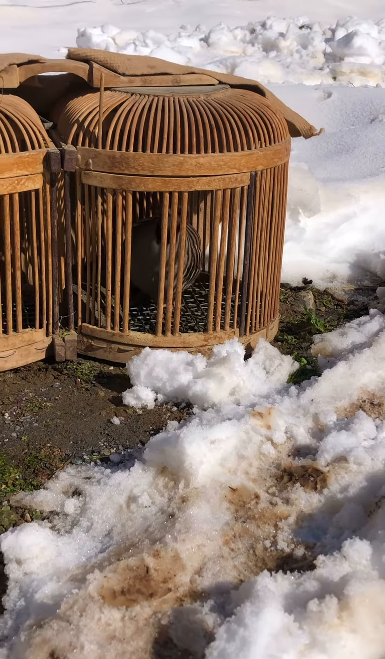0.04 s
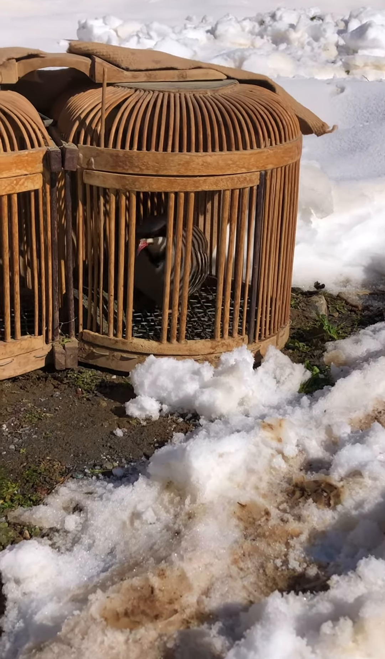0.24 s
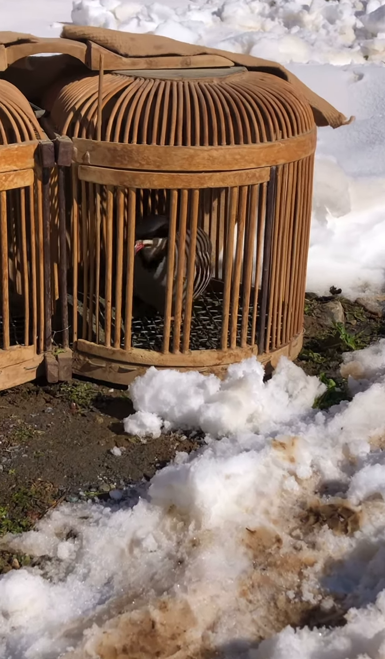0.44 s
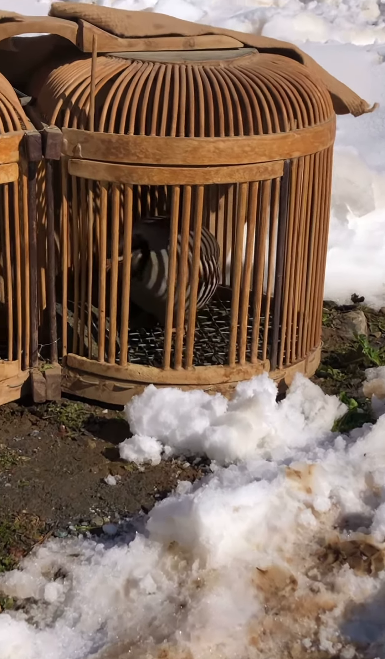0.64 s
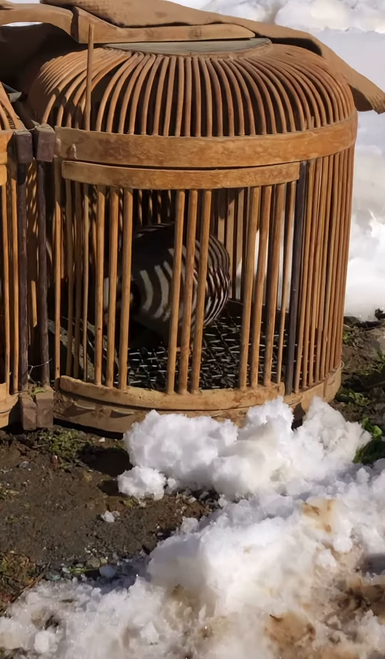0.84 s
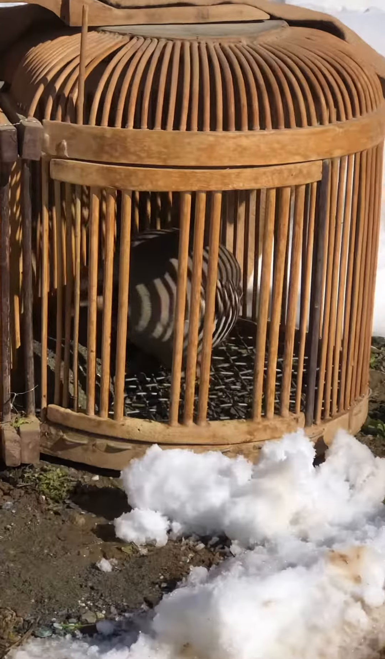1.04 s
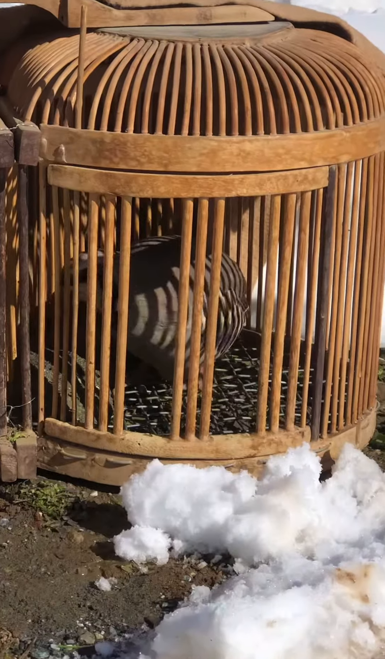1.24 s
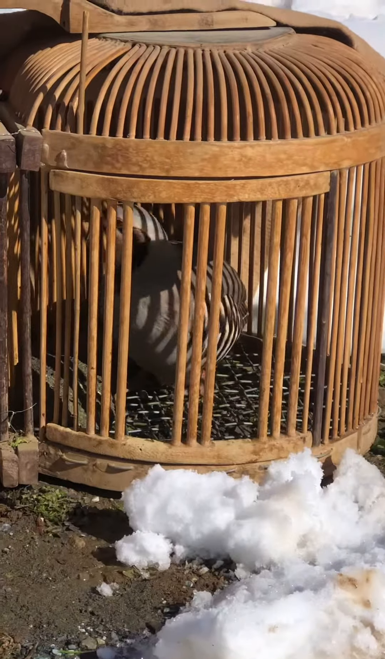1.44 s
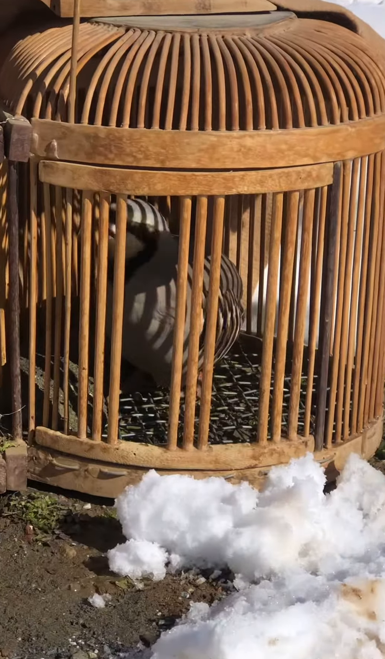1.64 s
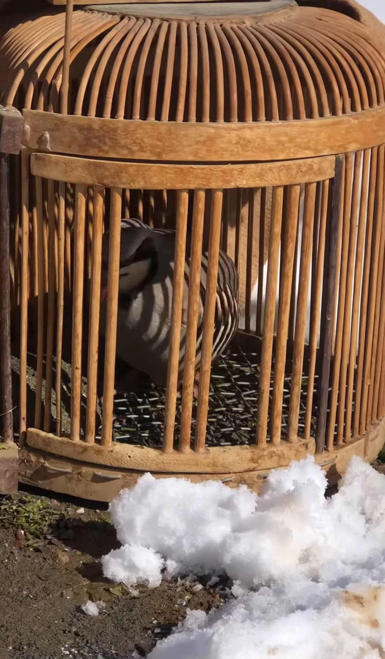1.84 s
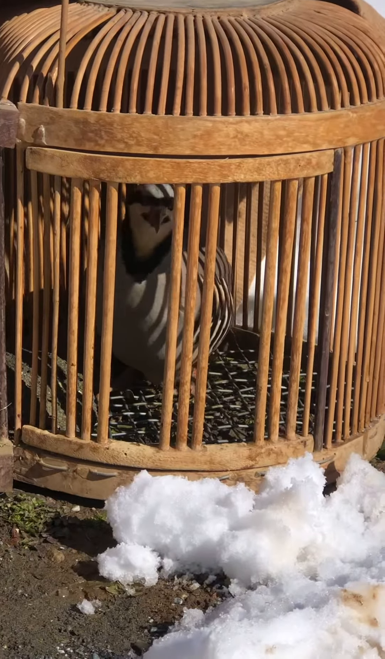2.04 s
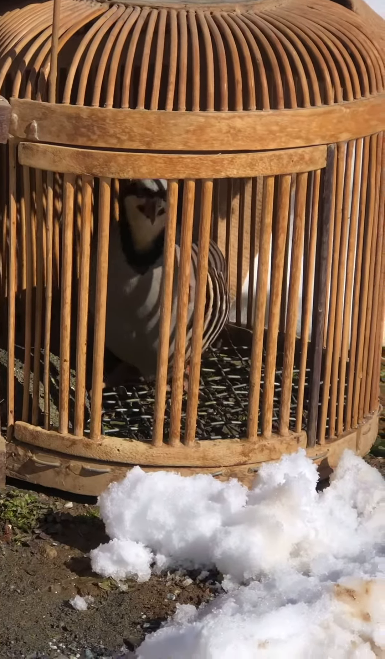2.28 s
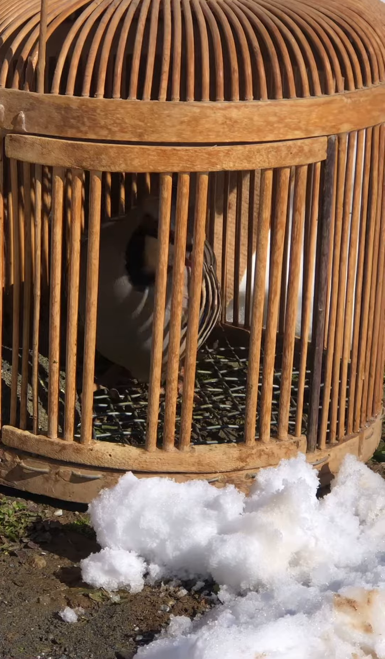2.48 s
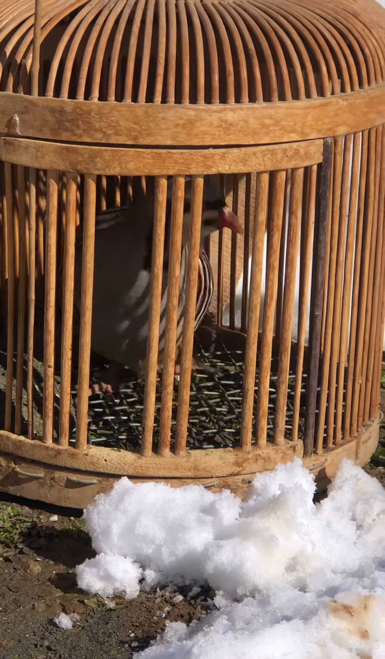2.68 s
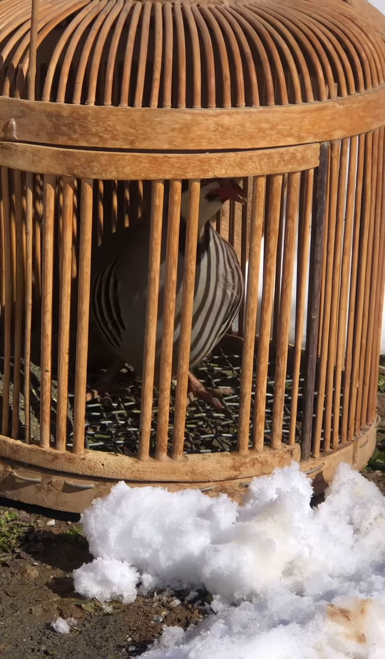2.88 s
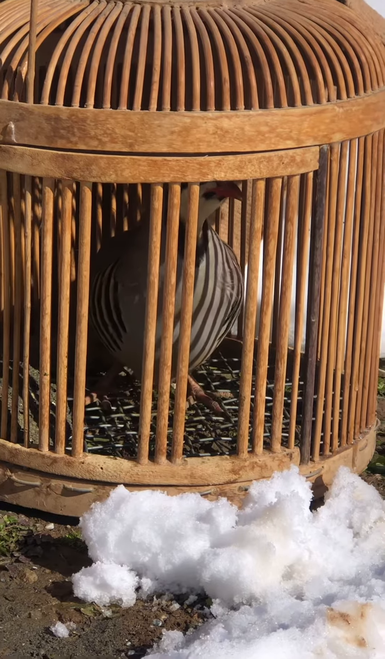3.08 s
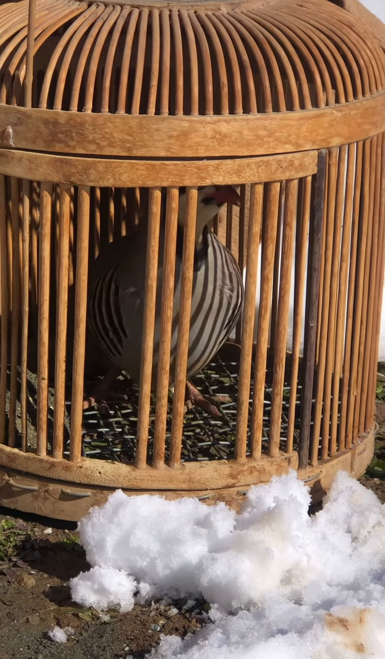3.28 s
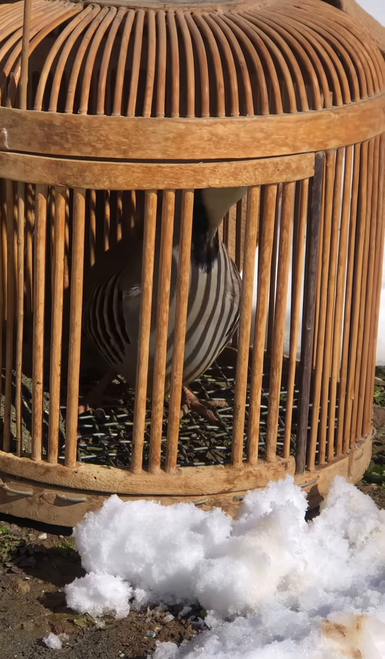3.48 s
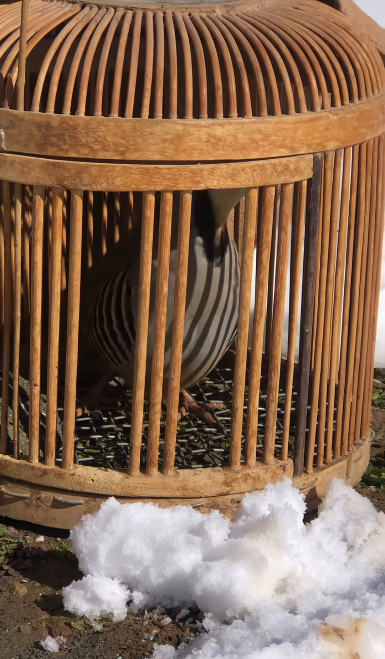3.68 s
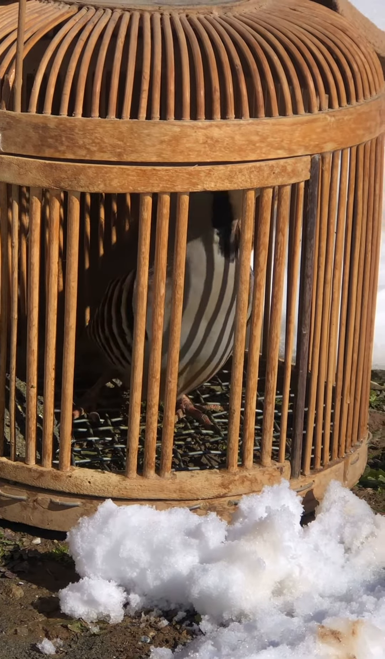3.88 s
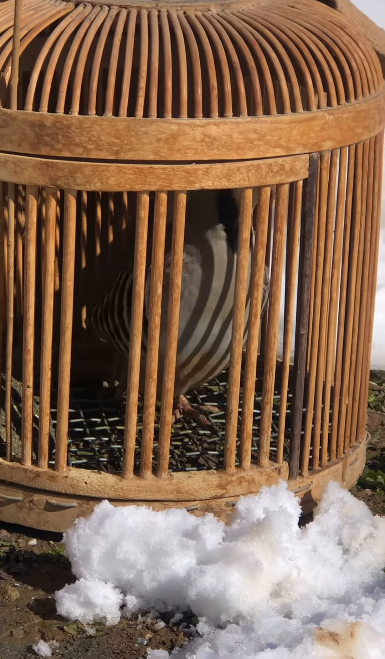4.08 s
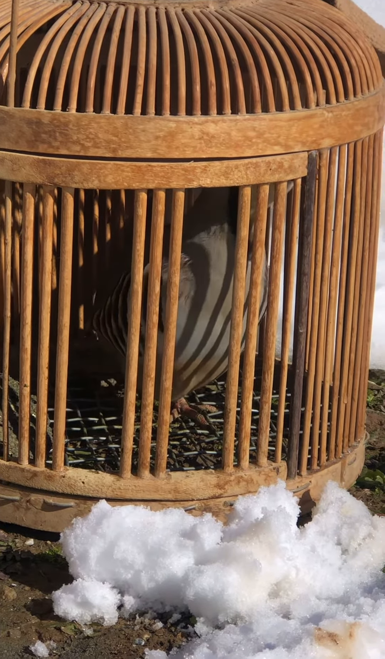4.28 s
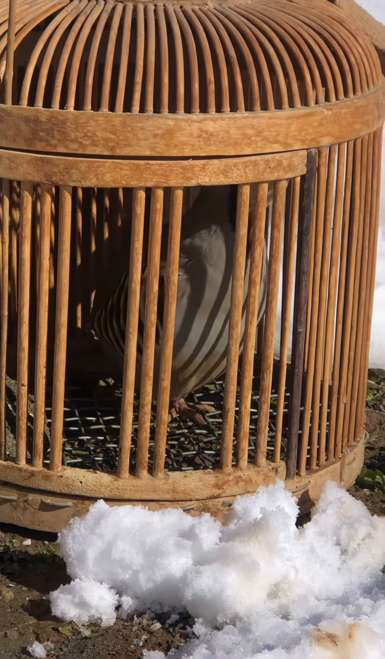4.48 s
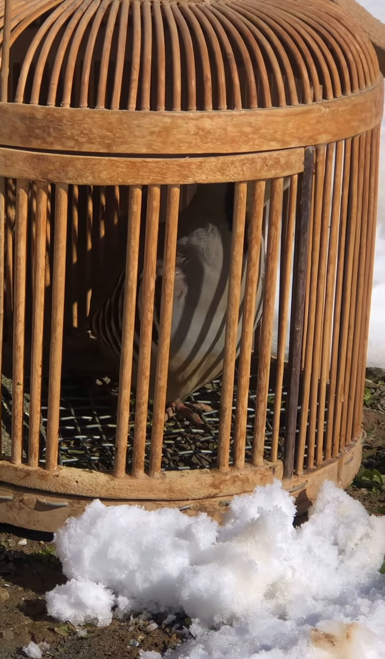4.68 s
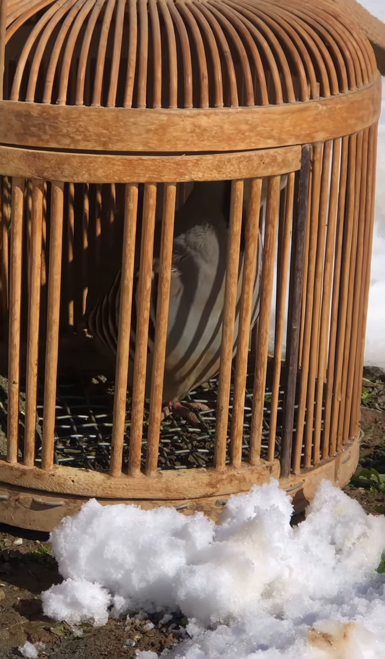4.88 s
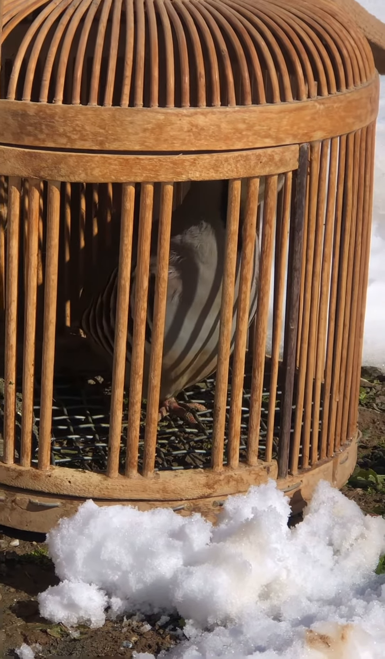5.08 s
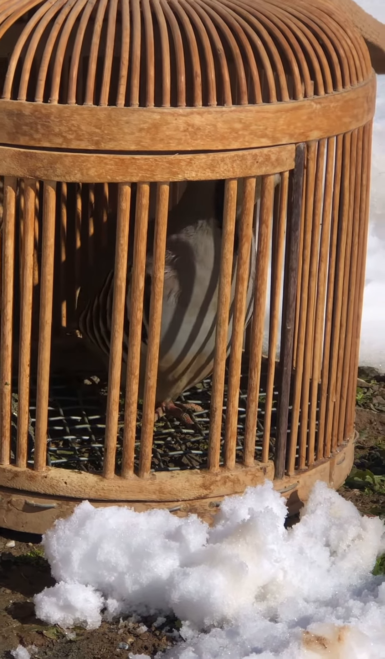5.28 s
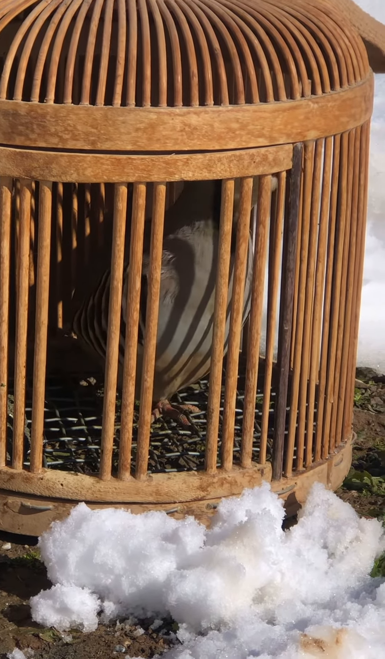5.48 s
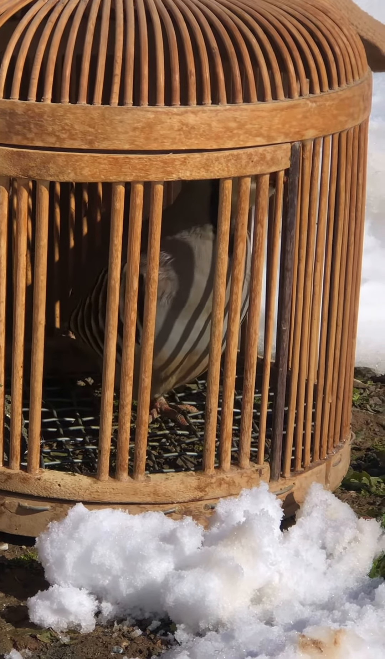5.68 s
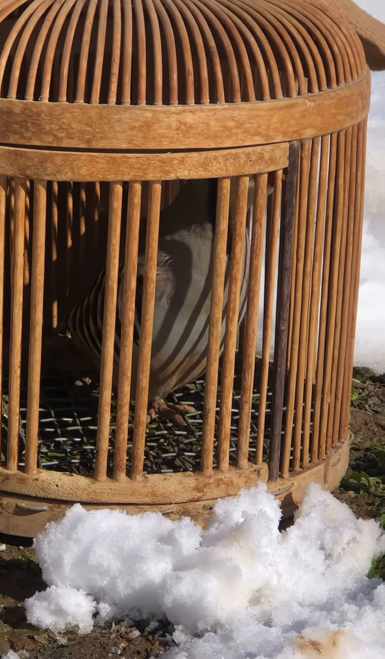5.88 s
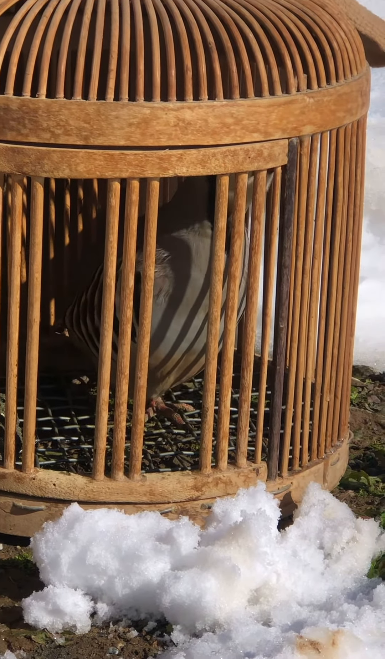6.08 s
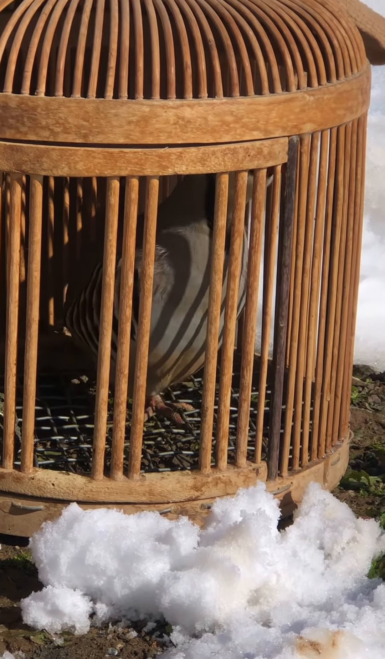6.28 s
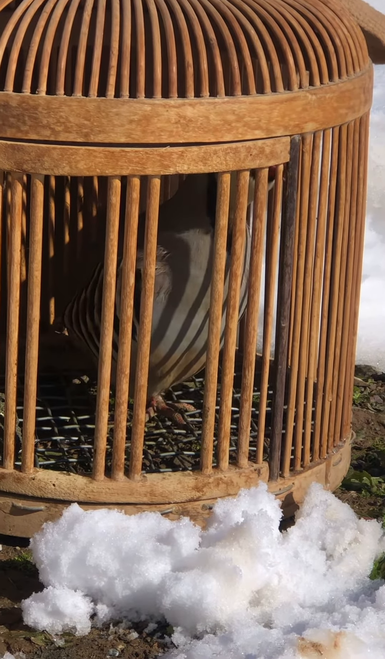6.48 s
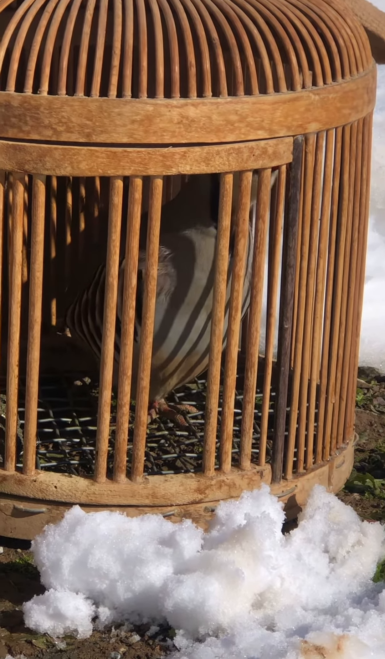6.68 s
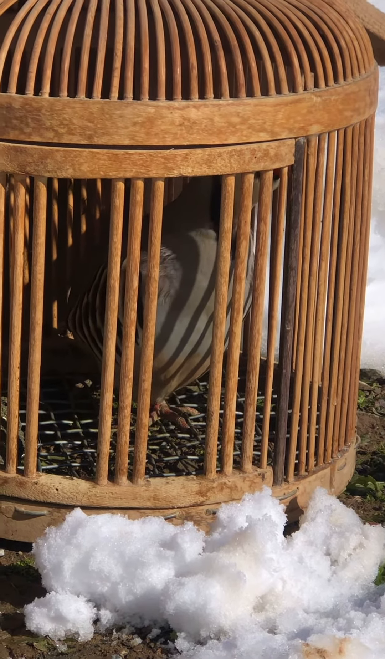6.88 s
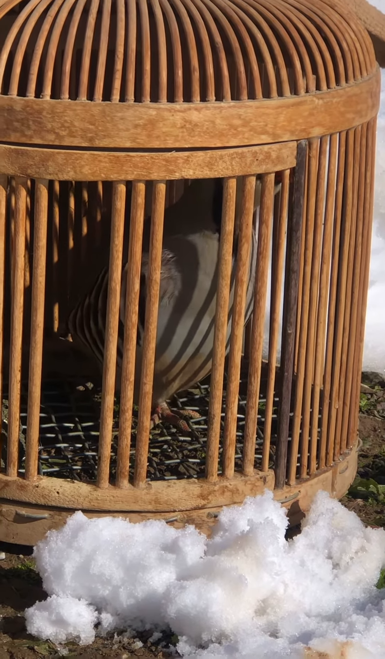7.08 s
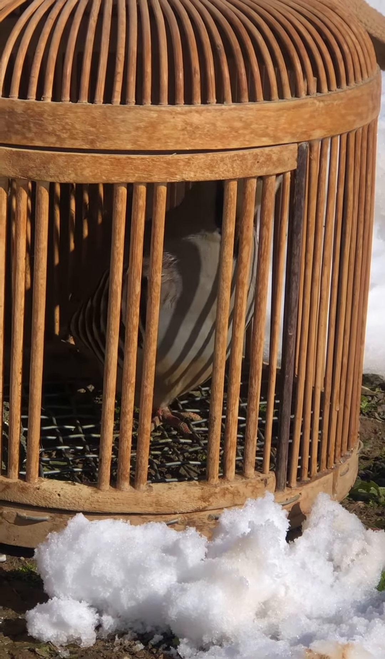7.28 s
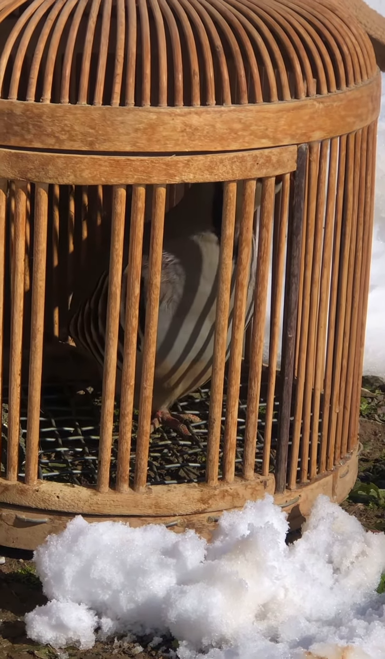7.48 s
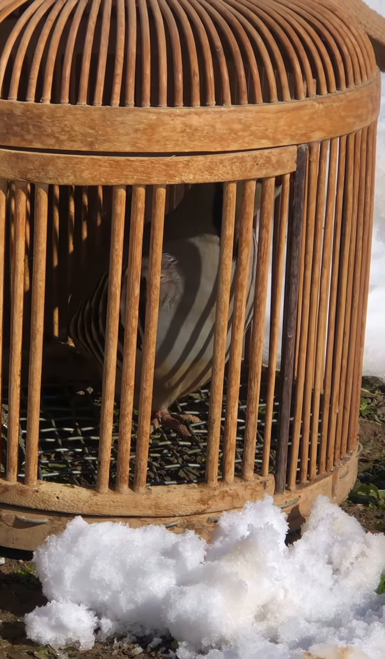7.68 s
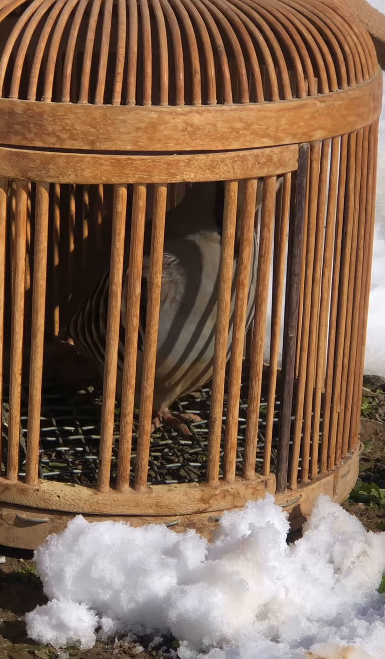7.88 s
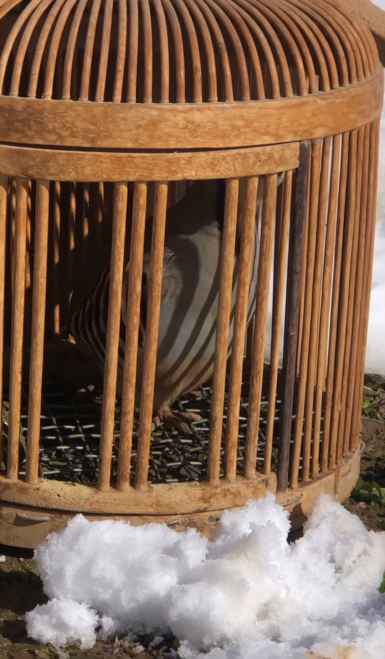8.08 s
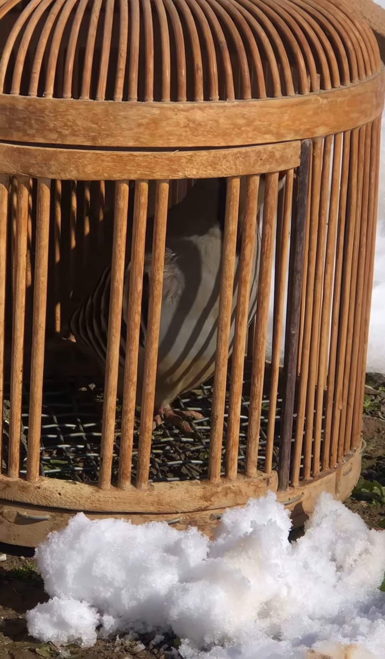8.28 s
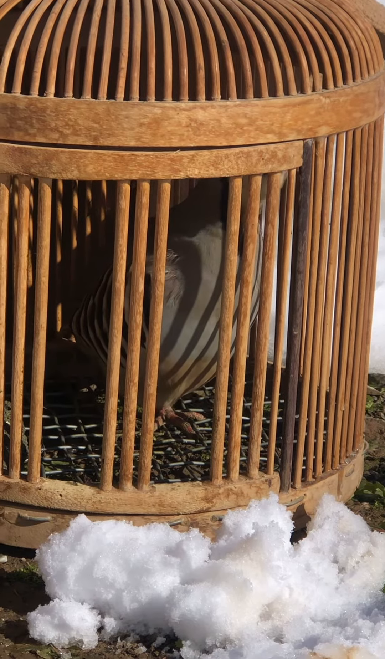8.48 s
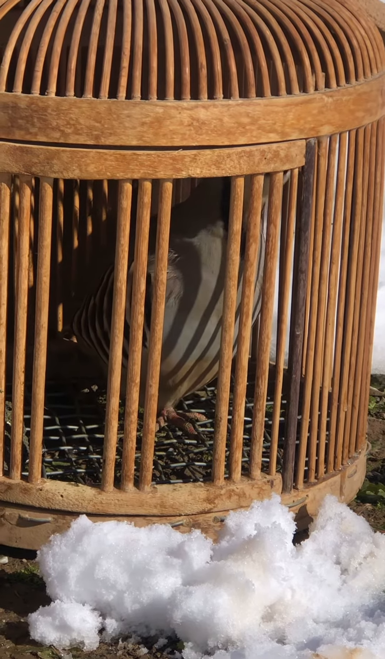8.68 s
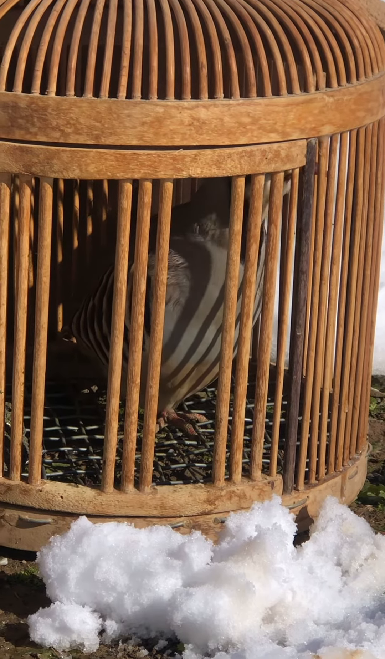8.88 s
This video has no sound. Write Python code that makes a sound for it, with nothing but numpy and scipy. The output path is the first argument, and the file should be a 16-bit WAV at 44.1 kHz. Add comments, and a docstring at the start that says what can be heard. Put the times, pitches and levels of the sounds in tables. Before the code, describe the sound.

Outdoors in quiet, snowy surroundings, a caged partridge is heard from close by. It begins with scattered low clucks, then works up to a loud, raspy run of rapid notes repeated in groups of three. Its wicker cage ticks lightly and its feet tap softly on the floor. Behind it are faint air noise, one tiny falling whistle from a small bird midway, and a distant partridge answering at the end.

```python
"""Rally call of a caged partridge

A chukar in a wicker cage on snowy ground works up from soft clucks to a loud, hoarse rally call.
Its voice is a source and a filter: the syrinx slips between periodic and irregular vibration, and
chest, throat and beak resonate, the beak opening wider from note to note. The cage gives small ticks
and footfalls; in a light breeze a distant partridge answers and a small bird whistles once."""
import sys
import numpy as np
from scipy import signal
from scipy.io import wavfile
from scipy.ndimage import uniform_filter1d, minimum_filter1d

SR = 44100
rng = np.random.default_rng(int(sys.argv[2]) if len(sys.argv) > 2 else 0)


def output_pcm(signal):
    """Save a mono or channel-first signal as 16-bit PCM at the path in sys.argv[1].

    Samples are clipped to [-1, 1] before scaling.
    """
    pcm = np.clip(np.atleast_2d(signal).T, -1, 1) * 32767
    wavfile.write(sys.argv[1], SR, np.round(pcm).astype(np.int16))


N = 394243

# Spectra of the outdoor air and of the breeze on the microphone: frequency_hz, gain_db
AIR_SPECTRUM = [(15, -31), (25, -4.5), (76, 1.5), (185, -3), (263, -3.5), (911, -8), (1070, -5.5),
                (1610, -8), (2000, -10.5), (2990, -11), (5280, -16), (14800, -25), (16000, -28)]
BREEZE_SPECTRUM = [(15, -11), (45, -5), (90, -3), (160, -11), (400, -37), (1500, -58)]
# Strength of the breeze: time_s, level_db
GUSTS = [(0, -87), (.28, -88), (.42, -64), (.52, -69), (.7, -72), (.82, -67), (1.05, -70), (1.3, -92),
         (8.94, -88)]
# Reverberation time of the yard: frequency_hz, t60_s
YARD_DECAY = [(200, 0.94), (1400, 1), (3500, 1), (8000, 0.57), (16000, 0.048)]
# Falling whistle of the small bird: time_s, pitch_hz, level_db
WHISTLE_GLIDE = [(5.172, 9000, -75), (5.185, 8800, -71), (5.205, 8050, -71), (5.218, 7000, -66),
                 (5.228, 6400, -61)]
# Notes of the distant partridge: start_s, length_s, relative_db, throat_hz
ANSWER_NOTES = [(8.271, 0.036, -47, 1570), (8.457, 0.027, -41, 1640), (8.628, 0.043, -44, 1700),
                (8.661, 0.049, -45.5, 1570), (8.836, 0.04, -42, 1700)]

# Ticks at the cage: start_s, woody_relative_db, sharp_relative_db
CAGE_TICKS = [(0.2177, -35, -41), (0.258, -59, -62), (0.71, -58, -59), (0.7532, -47, -53),
              (0.814, -30.5, -48), (0.861, -52, -65), (0.9133, -50.5, -57.5), (1.426, -38, -49.5),
              (1.521, -48, -58), (1.7642, -45.5, -54.5), (2.047, -37, -47), (2.2387, -55, -58),
              (2.6383, -35.5, -45), (2.843, -48, -55), (3.2955, -44, -53.5), (3.3353, -39.5, -59),
              (3.821, -39, -49.5), (3.931, -48, -46), (4.4373, -34.5, -50.5), (4.9912, -43, -51.5),
              (5.0465, -48, -46), (5.1435, -49, -58), (5.7598, -53, -57.5), (5.9358, -42, -46.5),
              (6.3684, -49, -47.5), (6.8588, -36.5, -51), (7.1566, -41.5, -50), (7.451, -38.5, -46),
              (7.5613, -44, -67), (8.07, -39, -46.5), (8.6668, -33.5, -44.5), (8.761, -42, -58)]
# Footfalls on the cage floor: start_s, relative_db
FOOTFALLS = [(0.501, -40.5), (0.542, -44), (0.731, -51), (0.779, -55), (2.855, -45.5), (3.829, -58),
             (4.334, -45.5), (5.173, -46.5), (5.759, -46.5), (6.956, -48), (8.046, -47)]
# Spectra of the two parts of a tick and of a footfall: frequency_hz, gain_db
WOODY_SPECTRUM = [(400, -20), (1500, -23), (3000, -10), (5500, -8.5), (8000, -22), (15000, -29.5)]
SHARP_SPECTRUM = [(2000, -71), (6000, -8.5), (9000, 10), (12500, 9.5), (16000, 3)]
FOOT_SPECTRUM = [(80, -28), (250, 6), (600, -4), (1400, -2.5), (2500, -22.5), (6000, -41), (15000, -47)]

# Responses of the shut beak, the chest and the throat: frequency_hz, gain_db
SHUT_BEAK_RESPONSE = [(150, -20), (280, -3), (450, -1.5), (700, -4.5), (950, -2), (1100, -8.5),
                      (1300, -14.5), (1600, -17), (2200, -28), (3000, -28.5), (4200, -38), (5600, -31.5),
                      (8000, -41), (15000, -49)]
CHEST_RESPONSE = [(100, -16), (200, -5), (450, 0), (650, -5.5), (900, -10), (1150, -7), (1700, -62),
                  (3000, -78)]
THROAT_RESPONSE = [(400, -35), (800, -28), (1020, -11), (1170, 4), (1350, 4), (1550, -1), (1750, -13.5),
                   (2000, -25.5), (2600, -37.5), (4000, -37.5), (8000, -77.5)]
# Resonances of the open beak: ratio_to_strongest, final_half_width_hz, gain_db
BEAK_FORMANTS = [(.8, 330, -10.5), (1, 230, 3), (1.402, 220, -13.5), (1.63, 260, -12), (2.06, 260, -18.5),
                 (2.4, 383, -25), (2.95, 544, -25.5), (3.45, 501, -22.5), (4.3, 850, -24.5)]
# The resonances sink as the beak opens: time_s, strongest_hz, treble_gain_db, top_extra_gain_db
BEAK_OPENING = [(2.15, 5200, 4, 10), (2.55, 5600, 0, 1), (2.8, 4570, -5, 8), (3.3, 4610, -4.5, 12),
                (3.55, 4185, -3, 1.5), (4.1, 4350, -5, 4.5), (4.552, 3815, -2, 2),
                (5.101, 3608, -1.5, -2.5), (5.65, 3492, -0.5, -3.5), (6.501, 3457, -1.5, -2.5),
                (8.599, 3460, 0, -3)]

# Clucks with the beak shut: start_s, length_s, first_hz, top_hz, last_hz, roughness (0-1), level_db
CLUCK_NOTES = [(0.28, 0.03, 603, 1030, 920, 0.31, -39), (1.126, 0.035, 544, 892, 937, 0.67, -42),
               (1.43, 0.035, 499, 920, 950, 0.67, -41), (1.766, 0.037, 588, 998, 1038, 0.9, -38.5),
               (1.862, 0.021, 940, 840, 710, 0.35, -39.5), (1.892, 0.044, 863, 900, 166, 0.7, -38.5)]
# The call repeats a growing phrase of three notes: a yelp (later a bark), a chuck and a drawl.
# Base values of the short notes: start_s, length_s, pitch_hz, throat_db, chest_db, treble_db
YELP_NOTES = [(2.134, 0.069, 749, -34, -48, -58), (2.347, 0.069, 668.4, -35, -48, -58),
              (2.529, 0.085, 725, -36, -46, -56.5), (2.733, 0.057, 697, -30.5, -48, -48.5),
              (3.19, 0.069, 721.6, -28, -47.5, -44), (3.689, 0.071, 692.3, -24.5, -46, -38.5),
              (4.204, 0.066, 743.5, -24, -45.5, -37)]
CHUCK_NOTES = [(2.89, 0.061, 700, -32, -46.5, -45.5), (3.347, 0.06, 711, -34.5, -44.5, -43),
               (3.86, 0.06, 710, -29.5, -46, -39.5), (4.37, 0.06, 758, -31.5, -41.5, -38.5),
               (4.912, 0.063, 730, -31, -40, -35.5), (5.475, 0.061, 724, -29, -41.5, -33),
               (6.043, 0.062, 727.5, -32, -39.5, -32.5), (6.613, 0.062, 713, -31, -39.5, -32),
               (7.186, 0.057, 728, -33.5, -39, -33), (7.776, 0.059, 732, -32, -40, -33),
               (8.388, 0.066, 709.6, -31, -40, -31.5)]
# A yelp arches, cracks and falls; a chuck is hoarse until its pitch has dropped:
# length_share, pitch_ratio, roughness (0-1), throat_offset_db, chest_offset_db, treble_offset_db
YELP_GESTURE = [(0, 0.86, 0.1, -13.5, -5.5, -23), (0.13, 0.97, 0.43, -1.5, -2, -3),
                (0.36, 1.03, 0.56, 4.5, 0, 4), (0.53, 0.8, 0.98, -0.5, 2.5, -0.5),
                (0.7, 0.54, 0.5, -0.5, 2, 1), (0.87, 0.385, 0.46, -7.5, 4, -9),
                (1, 0.335, 0.55, -18, 0, -24)]
CHUCK_GESTURE = [(0, 1.04, 0.32, -15.5, -10, -29), (0.13, 1.06, 0.61, -0.5, -6.5, -7),
                 (0.32, 0.95, 0.9, 1, -4.5, 0), (0.55, 0.83, 0.7, 1, 0.5, -1),
                 (0.74, 0.65, 0.6, -5, 0.5, -1), (0.88, 0.52, 0.37, -5, 4, -12.5),
                 (1, 0.48, 0.7, -30, -7.5, -19)]
# Base values of the long notes: start_s, length_s, break_share, catch_share, opening_hz, held_hz,
# opening_db, held_db, swell_db, chest_db, treble_db
BARK_NOTES = [(4.728, 0.084, 0.44, 0.57, 754, 385, -21, -22, -27, -41.5, -38),
              (5.272, 0.094, 0.35, 0.65, 742.4, 435.7, -23, -21, -23.5, -39.5, -33.5),
              (5.841, 0.09, 0.3, 0.66, 759.7, 440, -25.5, -21.5, -22.5, -39, -33.5),
              (6.409, 0.089, 0.36, 0.68, 781, 421, -24, -23, -23.5, -39.5, -33),
              (6.982, 0.091, 0.32, 0.64, 725, 438, -23, -23.5, -22.5, -40, -33.5),
              (7.565, 0.095, 0.24, 0.67, 754.3, 449, -25.5, -20.5, -19, -39, -32),
              (8.163, 0.105, 0.22, 0.55, 745, 450, -23.5, -24.5, -19, -39.5, -31.5)]
DRAWL_NOTES = [(2.994, 0.074, 0.45, 0.8, 788.5, 359, -40, -24.5, -33, -43.5, -46),
               (3.466, 0.11, 0.44, 0.67, 727, 380.7, -36.5, -22, -30, -43, -43.5),
               (3.973, 0.11, 0.44, 0.63, 747, 424.7, -36, -20.5, -25, -41.5, -38),
               (4.484, 0.1, 0.46, 0.68, 737.3, 439.3, -34.5, -22, -23.5, -39, -37),
               (5.027, 0.11, 0.44, 0.67, 732, 449.3, -37.5, -23.5, -17.5, -38, -35.5),
               (5.59, 0.11, 0.28, 0.69, 728, 453.6, -38, -28.5, -19, -37.5, -34),
               (6.158, 0.12, 0.39, 0.65, 751.5, 462, -36, -26.5, -19.5, -38.5, -33),
               (6.726, 0.12, 0.41, 0.61, 740, 453.3, -32.5, -24.5, -18.5, -38, -32.5),
               (7.3, 0.12, 0.39, 0.61, 754, 456.4, -35, -27, -18.5, -38, -33),
               (7.891, 0.13, 0.41, 0.56, 722, 454.8, -35, -27.5, -18.5, -37.5, -32.5),
               (8.505, 0.12, 0.41, 0.57, 745.6, 449.7, -34.5, -30, -19.5, -38.5, -33.5)]
# A bark opens at full force; a drawl opens softly and saves its force for the swell:
# stage (0-3), pitch_ratio, roughness (0-1), throat_offset_db, chest_offset_db, treble_offset_db
BARK_GESTURE = [(0, 1.06, 0.44, -14, -15, -16), (0.18, 0.96, 0.76, -5.5, -9, -3),
                (0.8, 0.9, 0.8, 0, -9, 3.5), (1.12, 1.0, 0.45, -5.5, 6.5, 3.5), (1.5, 0.93, 0.14, 1, -1, 2),
                (2, 1.05, 0.47, -14.5, 4, 3), (2.33, 1.0, 0.18, -0.5, 3.5, 5),
                (2.62, 0.9, 0.58, -0.5, -2, -3.5), (3, 0.57, 0.53, -21.5, -6, -26)]
DRAWL_GESTURE = [(0, 1.03, 0, -10, -23.5, -19.5), (0.2, 1.04, 0.13, -2.5, -5.5, -6),
                 (0.4, 0.72, 0.93, -1, -1.5, -2), (0.85, 0.74, 0.82, 3.5, -7, -1),
                 (1.2, 0.985, 0.34, -1, 3.5, 7), (2, 1.035, 0.27, -11.5, 4.5, 2.5),
                 (2.28, 1.0, 0.08, -1.5, 3, 7.5), (2.6, 0.98, 0.39, 0.5, 0.5, 0),
                 (2.82, 0.7, 0.48, -9.5, -5.5, -6.5), (3, 0.53, 0.7, -29, -8, -32)]
# Beak posture for each kind of note: tuning_ratio, pinch_hz, pinch_relative_db
YELP_POSTURE, CHUCK_POSTURE = (0.94, 2250, -21), (0.96, 2319, -8)
BARK_POSTURE, DRAWL_POSTURE = (1.015, 2740, -9.5), (0.99, 2303, -12)

WARM_UP_S = (3.0, 5.2)  # the bird finds its full voice between these times
BAND_LIMIT_HZ = 15850
FILTER_HZ = np.fft.rfftfreq(4096, 1 / SR)  # frequencies at which filter gains are given


def amp(db):
    """Amplitude grows tenfold with every 20 decibels."""
    return 10 ** (np.asarray(db) / 20)


def unit_rms(x):
    """Division by the rms gives a signal unit power."""
    return x / np.sqrt(np.mean(x ** 2) + 1e-20)


def steadied(x, size=300):
    """Division by the running rms flattens the envelope."""
    power = uniform_filter1d(uniform_filter1d(x ** 2, size), size)
    return x / np.sqrt(abs(power) + 1e-12)


def curve_at(points, hz):
    """A response curve is interpolated on a logarithmic frequency axis."""
    known_hz, value = np.transpose(points)
    return np.interp(np.log(hz + 1), np.log(known_hz + 1), value)


def add(mix, start_s, sound):
    """Superposition: a sound adds to the mix from its start time on."""
    part = mix[max(round(start_s * SR), 0):][:len(sound)]
    part += sound[:len(part)]


def ring(x, gain):
    """A minimum-phase filter takes its phase from the Hilbert transform of its log gain."""
    log_gain = np.log(np.maximum(gain, 1e-5))
    mirrored = np.r_[log_gain, log_gain[-2:0:-1]]
    taps = np.fft.ifft(np.exp(np.conj(signal.hilbert(mirrored)))).real
    return signal.fftconvolve(x, taps[:len(gain)])[:len(x)]


def colour(x, response):
    """Filtering multiplies the spectrum by a tabulated response."""
    return ring(x, amp(curve_at(response, FILTER_HZ)))


def wander(count, size):
    """Low-passed noise gives a smooth random fluctuation of unit rms."""
    return unit_rms(uniform_filter1d(uniform_filter1d(rng.standard_normal(count), size), size))


def controls(course):
    """Linear interpolation turns breakpoints into a time axis and continuous controls."""
    times, *columns = np.transpose(course)
    t = np.arange(times[0], times[-1], 1 / SR)
    return t, [np.interp(t, times, column) for column in columns]


def faded(x, size=130):
    """Short ramps at both ends remove the steps that would click."""
    n = np.arange(len(x))
    return x * np.minimum(np.minimum(n, n[::-1]) / size, 1)


def air(hiss_db=-66):
    """Outdoor air is steady broadband noise; breeze on the microphone adds a low rumble."""
    hiss = amp(hiss_db) * unit_rms(colour(rng.standard_normal(N), AIR_SPECTRUM))
    gusts = amp(np.interp(np.arange(N) / SR, *np.transpose(GUSTS)))
    return hiss + gusts * unit_rms(colour(rng.standard_normal(N), BREEZE_SPECTRUM))


def yard_echoes(x, echoes_per_s=2000):
    """Scattered echoes over the snow decay exponentially, the treble fastest."""
    taps = rng.standard_normal(SR) * (rng.random(SR) < echoes_per_s / SR)
    hz, t, spectrum = signal.stft(taps, SR, nperseg=256)
    decay = amp(-60 * t / curve_at(YARD_DECAY, hz)[:, None])
    tail = signal.istft(spectrum * decay, SR)[1]
    return signal.fftconvolve(x, tail / np.linalg.norm(tail))[:N]


def small_bird():
    """A thin whistle is a pure tone whose phase is the integral of its falling frequency."""
    t, (hz, db) = controls(WHISTLE_GLIDE)
    return t[0], faded(amp(db) * np.sin(2 * np.pi * np.cumsum(hz) / SR))


def far_partridge(pitch_hz=620, half_width_hz=230, gain_db=1):
    """Of a distant hoarse voice, only the band around the throat resonance carries."""
    out = np.zeros(N)
    for start_s, length_s, db, throat_hz in ANSWER_NOTES:
        share = np.linspace(0, 1, round(length_s * SR))
        _, hoarse = syrinx(pitch_hz * (1 - 0.146 * share), rough=0.7)
        voice = ring(hoarse, 1 / (1 + abs((FILTER_HZ - throat_hz) / half_width_hz) ** 2.1))
        add(out, start_s, faded(amp(db + gain_db - 20 * share ** 2) * steadied(voice)))
    return out


def cage_reflections(x, decay_s=0.012, delay_s=0.002, count=2000):
    """The nearby bars and ground return dense early reflections that die quickly."""
    t = np.arange(count) / SR
    taps = rng.standard_normal(count) * np.exp(-t / decay_s) * (t > delay_s)
    return signal.fftconvolve(x, taps / np.linalg.norm(taps))[:N]


def impact(snap_s, rattle_db, rattle_s, count=3000):
    """An impact is noise with two decays: a brief snap and the longer rattle of the wicker."""
    t = np.arange(count) / SR
    envelope = np.exp(-t / snap_s) + amp(rattle_db) * np.exp(-t / rattle_s)
    return rng.standard_normal(count) * envelope


def cage_ticks(woody_gain_db=1, sharp_gain_db=13):
    """A brief impact excites a wide spectrum, here a woody band and a sharp one."""
    out = np.zeros(N)
    for start_s, woody_db, sharp_db in CAGE_TICKS:
        hit = impact(snap_s=0.0015, rattle_db=-11.5, rattle_s=0.0077)
        woody, sharp = colour(hit, WOODY_SPECTRUM), colour(hit, SHARP_SPECTRUM)
        add(out, start_s, amp(woody_db + woody_gain_db) * woody / abs(woody).max())
        add(out, start_s, amp(sharp_db + sharp_gain_db) * sharp / abs(sharp).max())
    return out


def footfalls(gain_db=4):
    """Impacts on the cage floor sound dull because their energy lies at low frequencies."""
    out = np.zeros(N)
    for start_s, db in FOOTFALLS:
        step = colour(impact(snap_s=0.0036, rattle_db=-15, rattle_s=0.014), FOOT_SPECTRUM)
        add(out, start_s, amp(db + gain_db) * step / abs(step).max())
    return out


def pulses(cycles, hz):
    """Equal harmonics in phase, up to the band limit, sum to one sharp pulse a cycle."""
    harmonics = BAND_LIMIT_HZ / hz
    half_phase = np.pi * (cycles % 1) + 1e-9
    train = np.sin((2 * np.floor(harmonics) + 1) * half_phase) / np.sin(half_phase) - 1
    return unit_rms(train / np.sqrt(harmonics))


def syrinx(hz, rough, jitter=0.0082, rough_jitter=0.0305, chaos=0.25, hiss=0.15, leak=0.048):
    """One side of the syrinx pulses regularly; irregular beating of the other makes the mix hoarse."""
    count = len(hz)
    cycles = np.cumsum(hz * (1 + (jitter + rough_jitter * rough) * wander(count, size=110))) / SR
    regular = pulses(cycles, hz)
    loose_hz = 0.79 * hz * np.exp(chaos * wander(count, size=40))  # the second side beats lower
    loose = pulses(np.cumsum(loose_hz) / SR + rng.random(), loose_hz)
    puffs = unit_rms(np.exp(-(cycles % 1) / 0.61) * rng.standard_normal(count))  # air, once a cycle
    loose_share = np.clip((rough - 0.25) / 0.55, 0, 0.92)
    irregular = unit_rms(loose + hiss * puffs)
    hoarse = np.sqrt(1 - loose_share) * regular + np.sqrt(loose_share) * irregular + leak * puffs
    shimmer = np.exp(0.26 * loose_share * wander(count, size=60))  # rough cycles differ in strength
    return regular, hoarse * shimmer


def timidity(time_s):
    """A linear crossfade from 1 to 0 marks the bird finding its full voice."""
    return np.interp(time_s, WARM_UP_S, [1, 0])


def with_edges(times, hz, rough, db, *bands_db, attack_s=0.004, timid_attack_s=0.009, release_s=0.009):
    """Attack and release transients frame a note's course; early notes start more gently."""
    course = np.column_stack([np.maximum.accumulate(times), hz, np.clip(rough, 0, 1), db, *bands_db])
    before, after = course[0].copy(), course[-1].copy()
    before[0] -= attack_s + timidity(times[0]) * (timid_attack_s - attack_s)
    after[0] += release_s
    course = np.vstack([before, course, after])
    course[[0, -1], 3] -= 32  # dB down at both ends
    return course


def cluck_course(start_s, length_s, first_hz, top_hz, last_hz, rough, db, top_at=0.3, fade_at=0.76):
    """A cluck glides through three pitches while its vibration turns from clean to rougher."""
    share = np.array([0, top_at, fade_at, 1])
    hz = np.interp(share, [0, top_at, 1], [first_hz, top_hz, last_hz])
    roughness = rough * np.interp(share, [0, fade_at], [0.16, 1])
    return with_edges(start_s + length_s * share, hz, roughness, db + np.array([-7, 0, 0, -7]))


def cluck(course, undertone=0.47):
    """Period doubling: strong and weak pulses alternate, adding a subharmonic behind the shut beak."""
    t, (hz, rough, db) = controls(course)
    regular, hoarse = syrinx(hz, rough)
    depth = undertone * np.clip(hz / 900, 0, 1) ** 2
    alternation = 1 + depth * np.cos(np.pi * np.cumsum(hz) / SR)
    voice = colour((hoarse + 0.21 * regular) * alternation, SHUT_BEAK_RESPONSE)
    return t[0], faded(amp(db) * steadied(voice))


def chest(regular, hoarse, rough):
    """The chest passes the low harmonics; their periodic part weakens as roughness grows."""
    drive = np.clip(1 - 0.86 * rough, 0, 1) * regular + 0.13 * hoarse
    return steadied(colour(drive, CHEST_RESPONSE))


def throat(t, drive, hz, tight_ratio=1.106, tighten_s=0.029):
    """The throat formant lies higher while the pitch is high; early notes tighten it late."""
    lag = timidity(t[0]) * np.exp(-((t - t[0]) / tighten_s) ** 2)
    tension = np.clip((hz - 480) / 200, 0, 1) * (1 - lag)
    tight = ring(drive, amp(curve_at(THROAT_RESPONSE, FILTER_HZ / tight_ratio)))
    relaxed = colour(drive, THROAT_RESPONSE)
    return steadied(tension * tight + (1 - tension) * relaxed, size=260)


def moving_formant(x, hz, half_width_hz):
    """Heterodyning makes a moving resonance: shift hz down to zero, low-pass, and shift back."""
    carrier = np.exp(2j * np.pi * np.cumsum(hz) / SR)
    baseband = signal.lfilter(*signal.butter(3, half_width_hz, fs=SR), x / carrier)
    return 2 * (carrier * baseband).real


def beak(t, drive, loud_db, tuning, arch=0.04, sway=0.029, flare=0.25, flare_from_db=-32):
    """The beak's formants arch up and down within a note; a harder note has more treble."""
    times, *columns = np.transpose(BEAK_OPENING)
    centre_hz, treble_db, top_db = (np.interp(t.mean(), times, column) for column in columns)
    damping = centre_hz / BEAK_OPENING[-1][1]  # a narrow beak has broader resonances
    gape = np.sin(np.linspace(0, np.pi, len(t)))
    bend = 1 + arch * (gape - 0.85) + sway * wander(len(t), size=500)
    strongest_hz = tuning ** (1 - timidity(t[0])) * centre_hz * bend
    treble = amp(treble_db + flare * np.maximum(loud_db - flare_from_db, -10))
    out = np.zeros(len(t))
    for ratio, half_width_hz, db in BEAK_FORMANTS:
        if ratio * centre_hz < 0.45 * SR:
            gain = amp(db) * (treble if ratio > 1.2 else 1) * (amp(top_db) if ratio > 2.2 else 1)
            out += gain * moving_formant(drive, ratio * strongest_hz, half_width_hz * damping)
    return steadied(out)


def pinch(drive, centre_hz, half_width_hz=230):
    """A pinched, bright voice excites one more resonance between throat and beak."""
    return steadied(ring(drive, 1 / (1 + abs((FILTER_HZ - centre_hz) / half_width_hz) ** 3)))


def open_note(course, tuning, pinch_hz, pinch_db, beak_gain_db=-1.5, flutter_db=3.47):
    """Source and filter: one syrinx drives parallel resonators, their levels relative to the throat."""
    t, (hz, rough, db, chest_db, treble_db) = controls(course)
    regular, hoarse = syrinx(hz, rough)
    voice = throat(t, hoarse, hz)
    voice += amp(chest_db) * chest(regular, hoarse, rough)
    voice += amp(treble_db + beak_gain_db) * beak(t, hoarse, db + treble_db, tuning)
    voice += amp(pinch_db + 1.4 * treble_db) * pinch(hoarse, pinch_hz)
    rattle_db = flutter_db * rough * wander(len(t), size=170)  # a hoarse voice rattles
    return t[0], faded(amp(db + rattle_db) * voice, size=60)


def short_course(gesture, arch, start_s, length_s, pitch_hz, throat_db, chest_db, treble_db):
    """A gesture modulates pitch and level; arch lowers the opening pitch and holds up the end."""
    share, ratio, rough, throat_offset, chest_offset, treble_offset = np.transpose(gesture)
    ratio = ratio * (1 + arch * np.interp(share, [0, 0.2, 0.75], [-0.25, 0.1, 1]))
    db = throat_db + throat_offset
    return with_edges(start_s + length_s * share, pitch_hz * ratio, rough, db,
                      chest_db + chest_offset - db, treble_db + treble_offset - db)


def long_course(gesture, start_s, length_s, break_at, catch_at, opening_hz, held_hz,
                opening_db, held_db, swell_db, chest_db, treble_db, scoop=0.3, sag=0.204):
    """A register break ends the high opening; a low tone holds to a catch in the throat, then swells."""
    stage, ratio, rough, throat_offset, chest_offset, treble_offset = np.transpose(gesture)
    share = np.interp(stage, np.arange(4), [0, break_at, catch_at, 1])
    # Early notes scoop up from below and sag as they are held.
    bend = np.interp(stage, [0, 0.4, 1.2, 2.6, 3], [-scoop, scoop, sag / 2, -sag, 0])
    hz = ratio * np.where(stage < 1, opening_hz, held_hz) * (1 + timidity(start_s) ** 2 * bend)
    db = throat_offset + np.interp(stage, [0.9, 1.1, 2, 2.2], [opening_db, held_db, held_db, swell_db])
    return with_edges(start_s + length_s * share, hz, rough, db,
                      chest_db + chest_offset - db, treble_db + treble_offset - db)


def caged_partridge(timid_arch=0.75):
    """Articulation: gesture and beak posture shape one voice into clucks and four kinds of call note."""
    out = np.zeros(N)
    for row in CLUCK_NOTES:
        add(out, *cluck(cluck_course(*row)))
    for row in YELP_NOTES:
        add(out, *open_note(short_course(YELP_GESTURE, 0, *row), *YELP_POSTURE))
    for row in CHUCK_NOTES:
        arch = timid_arch * timidity(row[0])
        add(out, *open_note(short_course(CHUCK_GESTURE, arch, *row), *CHUCK_POSTURE))
    for row in BARK_NOTES:
        add(out, *open_note(long_course(BARK_GESTURE, *row), *BARK_POSTURE))
    for row in DRAWL_NOTES:
        add(out, *open_note(long_course(DRAWL_GESTURE, *row), *DRAWL_POSTURE))
    return out


def scene(cage_db=-19, near_echo_db=-37, far_echo_db=-17):
    """Direct sound, reflections and air superpose; distant sources have a larger share of echo."""
    near = cage_ticks() + footfalls() + caged_partridge()
    far = far_partridge()
    add(far, *small_bird())
    echoes = yard_echoes(amp(near_echo_db) * near + amp(far_echo_db) * far)
    return (near + amp(cage_db) * cage_reflections(near) + far + echoes + air())[None]


def record(dry, ceiling_db=-8.5, size=90):
    """A fast limiter lowers the gain around the loudest peaks; a low-pass filter limits the band."""
    gain = np.minimum(1, amp(ceiling_db) / (abs(dry) + 1e-9))
    limited = dry * uniform_filter1d(minimum_filter1d(gain, 2 * size), size)
    low_pass = signal.firwin(511, BAND_LIMIT_HZ, window=("kaiser", 9), fs=SR)
    return signal.oaconvolve(limited, low_pass[None], "same")


dry = scene()
out = record(dry)
output_pcm(out)
```